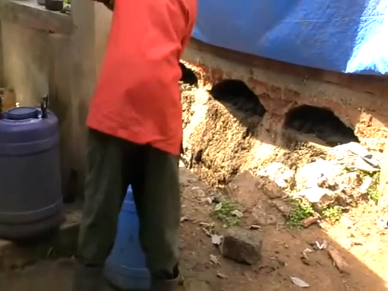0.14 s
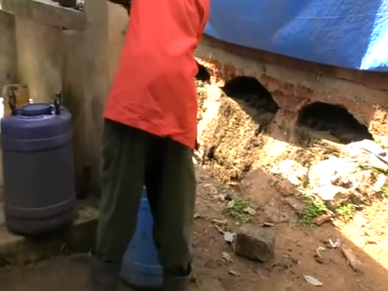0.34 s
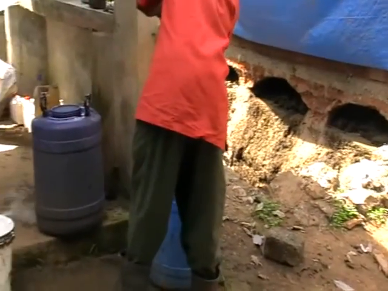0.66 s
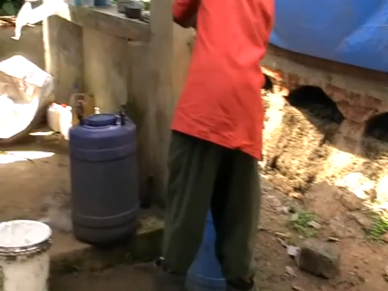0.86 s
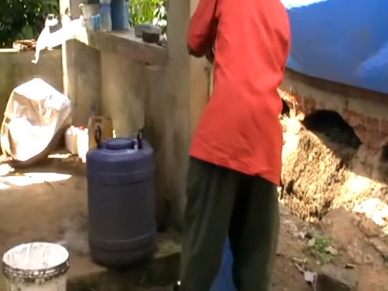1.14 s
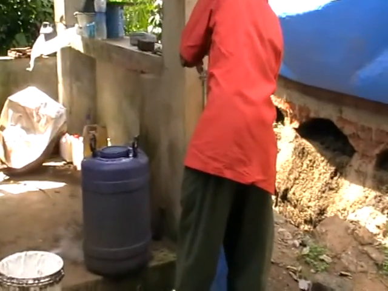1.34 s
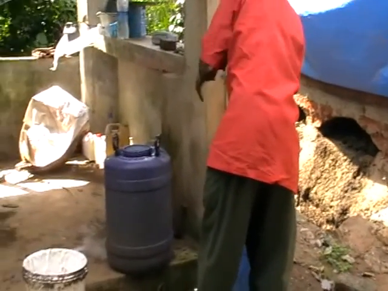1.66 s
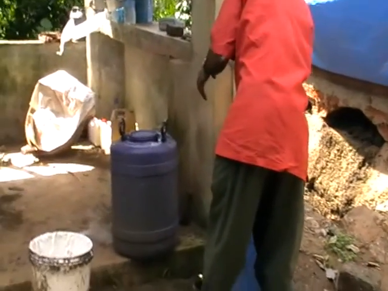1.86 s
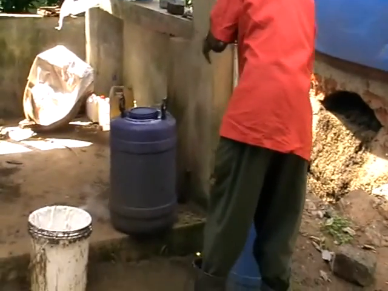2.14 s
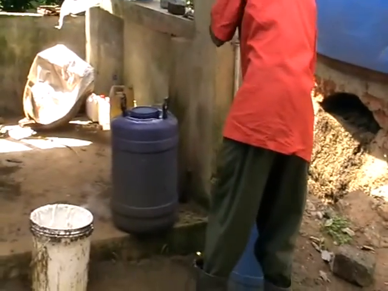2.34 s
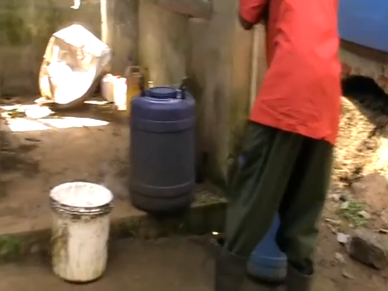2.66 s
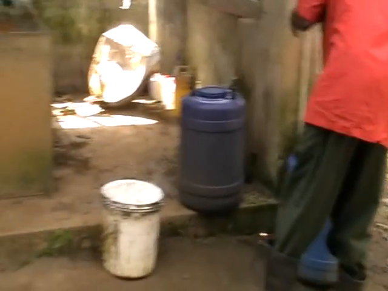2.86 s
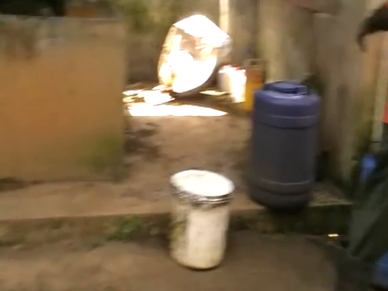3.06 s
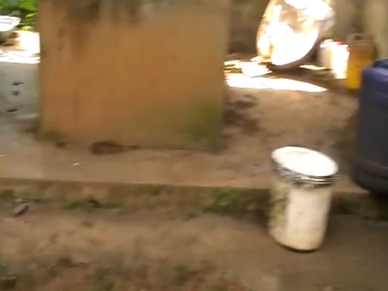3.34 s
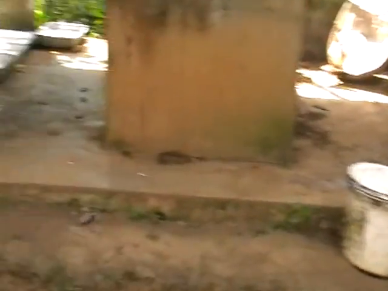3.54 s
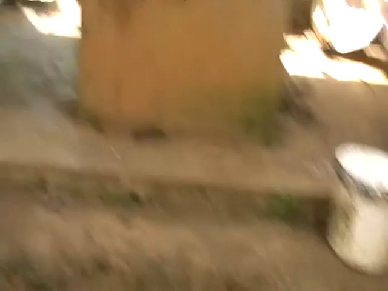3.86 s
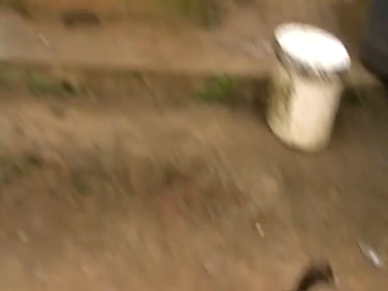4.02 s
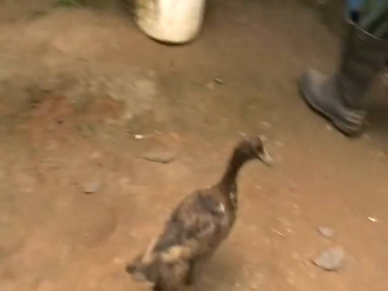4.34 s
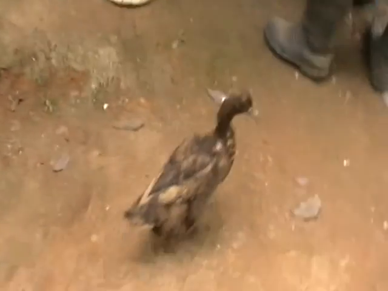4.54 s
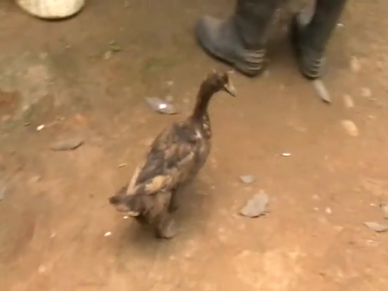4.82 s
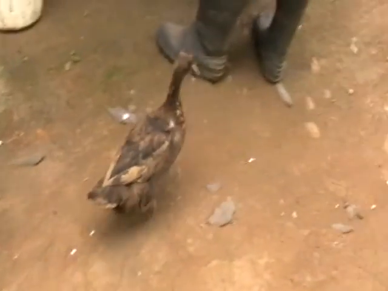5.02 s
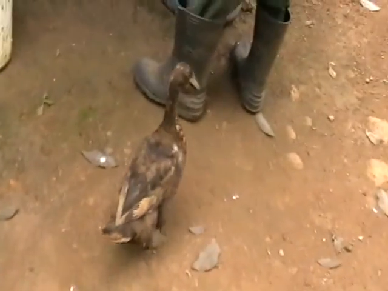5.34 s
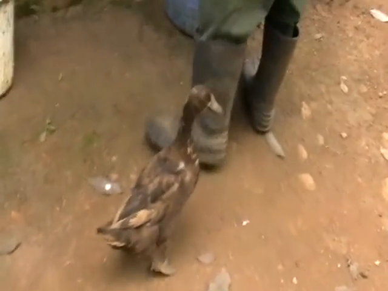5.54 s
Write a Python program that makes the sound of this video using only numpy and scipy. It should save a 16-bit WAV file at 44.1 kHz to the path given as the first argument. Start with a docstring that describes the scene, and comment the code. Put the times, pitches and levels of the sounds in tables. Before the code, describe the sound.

Outdoors, steady splashing water and buffeting wind noise surround a close duck's short nasal quacks, ending in fast dry clucks that grow loud.

```python
"""Water runs and splashes into a hollow container with a dull boom or two, and wind rumbles on a microphone's
two ports. Soft coos follow, then a duck in a walled yard: short quacks led in by coos, and at the end a
quickening run of clucks. Each quack or cluck is a handful of syrinx pulses ringing the throat; coos and booms
are gliding tones. Water is noise and droplets ringing the container, with single splats, plinks and ticks; now
and then a dull thud falls; wind is buffeted noise. A faint low drone lies beneath."""
import sys
import numpy as np
from scipy import signal
from scipy.fft import rfft, irfft
from scipy.io import wavfile
from scipy.ndimage import uniform_filter1d

SR = 44100
rng = np.random.default_rng(int(sys.argv[2]) if len(sys.argv) > 2 else 0)


def wrap_up_sound(samples):
    """Save the sound to the file named by the first command line argument, as 16-bit audio."""
    columns = np.atleast_2d(samples).T
    # keep every value between -1 and 1, then stretch to whole-number steps
    tamed = np.clip(columns, -1, 1)
    steps = np.round(tamed * 32767).astype(np.int16)
    wavfile.write(sys.argv[1], SR, steps)


N = 250929
T = np.arange(N) / SR  # seconds


def undb(db):
    """Decibels to gain."""
    return 10 ** (np.asarray(db) / 20)


def unit(x):
    """Scale to rms 1."""
    return x / np.sqrt(np.mean(x ** 2))


def curve(rows):
    """A (seconds, value) table as a line through time."""
    s, values = np.transpose(rows)
    return np.interp(T, s, values)


def add(out, x, s):
    """Mix x in from s seconds on."""
    i = max(int(s * SR), 0)
    out[..., i:i + x.shape[-1]] += x[..., :max(N - i, 0)]


def gains(points, size, ratio=1):
    """A (Hz, dB) outline on the bins of a transform; a larger body lowers it."""
    hz, db = np.transpose(points)
    bins_hz = np.arange(size // 2 + 1) * SR / size
    return undb(np.interp(np.log(bins_hz * ratio + 1), np.log(hz), db))


def colour(x, points):
    """Give a sound the outline of a spectrum."""
    return irfft(rfft(x) * gains(points, N), N)


def band(x, hz, width):
    """One resonance, gain 1 at its centre."""
    g = np.tan(np.pi * min(hz / SR, .45))
    k = width / hz
    return signal.lfilter([g * k, 0, -g * k], [1 + g * k + g * g, 2 * g * g - 2, 1 - g * k + g * g], x)


def walk(rate):
    """Smooth random wander with spread 1, taking rate steps per second."""
    k = max(int(SR / rate), 2)
    steps = np.repeat(rng.standard_normal(N // k + 1), k)
    return unit(uniform_filter1d(steps, k)[:N])


def spread(mid, side, side_db):
    """Left and right from a common and an opposed part."""
    return mid + undb(side_db) * np.array([side, -side])


def swell_gain(start, hold, db, rise, fall):
    """A gain that rises, holds and dies away."""
    before = np.maximum(start - T, 0)
    after = np.maximum(T - start - hold, 0)
    return undb(db) * np.exp(-before / rise - after / fall)


def tones(table, overtone_db, waver, rough, crest=0.56):
    """Short gliding, fluttering tones with a weak octave, loudest at the share crest of their length."""
    out = np.zeros(N)
    for s, length, hz, glide, db in table:
        n = int(length * SR)
        octaves = glide * (np.arange(n) / SR - length / 2)
        pitch = hz * 2 ** octaves * (1 + waver * walk(180)[:n])
        phase = 2 * np.pi * np.cumsum(pitch) / SR
        progress = np.interp(np.arange(n) / n, [0, crest, 1], [0, .5, 1])
        shape = np.sin(np.pi * progress) ** 2 * (1 + rough * walk(400)[:n])
        tone = np.sin(phase) + undb(overtone_db) * np.sin(2 * phase)
        add(out, undb(db) * shape * tone, s - length / 2)
    return out


# The drone's loudness. Each row: time in seconds, rms level in dB.
DRONE_LEVEL = [(0, -50), (1.1, -47.5), (2.4, -54.5), (3.2, -44.5), (5.69, -44)]
DRONE_HZ = 246.8


def drone():
    """A faint low sine that wavers in pitch."""
    phase = 2 * np.pi * np.cumsum(DRONE_HZ + 5 * walk(18)) / SR
    return undb(curve(DRONE_LEVEL)) * unit(np.sin(phase))


# Gusts on the ports. Each row: start in seconds, hold in seconds, level in dB before the port balance.
GUSTS = [(0.46, 0.44, -50), (0.855, 0.86, -40.5), (1.77, 0.073, -34.5), (2.016, 0.24, -40),
         (3.604, 0.36, -38.5), (4.123, 0.17, -31.5), (4.343, 0.22, -26.5), (4.615, 0.24, -32.5),
         (4.95, 0.15, -28.5), (5.168, 0.066, -30.5), (5.27, 0.39, -37.5)]
# Outline of the wind rumble. Each row: frequency in Hz, relative level in dB.
WIND_SPECTRUM = [(15, -55), (25, -44), (62, -3), (129, -0.5), (186, -4), (236, -8.5), (340, -15.5),
                 (528, -29), (659, -31.5), (1140, -40), (1500, -45), (1950, -65), (3300, -120)]
GUST_RISE_S, GUST_FALL_S = .02, .04
BREEZE_DB = -63.5  # light air between gusts, before the port balance
EDDY_DB, EDDIES_PER_S = 2, 22  # depth and rate of the buffeting


def eddies(force):
    """Low noise driven by the force of the wind and buffeted at random."""
    rumble = unit(colour(rng.standard_normal(N), WIND_SPECTRUM))
    return rumble * force * undb(EDDY_DB * walk(EDDIES_PER_S))


def wind():
    """Eddies buffet the two ports, more against each other than together, and the right a little harder."""
    gust_power = sum(swell_gain(*gust, GUST_RISE_S, GUST_FALL_S) ** 2 for gust in GUSTS)
    force = np.sqrt(undb(BREEZE_DB) ** 2 + gust_power)
    left, right = spread(eddies(force), eddies(force), side_db=3)
    return np.array([undb(-1.5) * left, undb(0.5) * right])


def droplets(rate, scatter_db):
    """Dense tiny impacts of very uneven size, rate per second."""
    sizes = undb(scatter_db * np.minimum(rng.exponential(size=N), 4))
    hits = rng.random(N) < rate / SR
    return unit(rng.choice([-1, 1], N) * sizes * hits)


def hollow(modes):
    """Air resonances kept ringing by the stream, rounded off by one broad resonance."""
    ringing = sum(undb(db) * band(rng.standard_normal(N), hz, width) for hz, width, db in modes)
    return unit(band(ringing, 210, 670))


# Strength of the stream. Each row: time in seconds, level of the fine spray in dB before its trim.
FLOW = [(0, -53), (0.75, -54), (1.35, -49), (1.9, -51), (2.45, -48.5), (3.2, -51.5), (3.95, -47),
        (4.55, -49.5), (4.85, -47), (5.25, -52.5), (5.69, -50.5)]
# Outline of the splashing. Each row: frequency in Hz, relative level in dB.
SPLASH_SPECTRUM = [(240, -6.5), (400, -5), (511, -10), (633, -2), (796, -4.5), (1150, -6.5), (1630, -7),
                   (1960, -6.5), (2120, -6.5), (3850, -10.5), (7210, -11.5), (11400, -17), (15500, -25.5)]
# Air in the container. Each row: frequency in Hz, width in Hz, relative drive in dB.
CONTAINER_AIR = [(113, 83, -1), (197.5, 49, -5.5), (260, 45, -10.5), (327, 83, -3.5), (628, 15, -5.5),
                 (1664, 62, -8), (2107, 24, -5)]
# What the square hit rings. Each row: frequency in Hz, width in Hz, relative drive in dB.
SQUARE_RING = [(195, 23, 1), (304, 35, 1), (623, 20, -2)]
# The stream hits the container squarely for a moment. One row: start in seconds, hold in seconds, level in dB.
SQUARE_HIT = (2.27, 0.7, -38.5)
SQUARE_EDGE_S = 0.05  # rise and fall
# The coarse splash follows the flow less than the spray does.
USUAL_FLOW_DB, SPLASH_DB, SPLASH_PER_DB = -50, -37, 0.47
SPRAY_TRIM_DB, DRUM_DB = -1, -43


def water():
    """A stream breaks into droplets; its spray comes and goes, and it drums on the air in the container."""
    mid, side = (colour(rng.standard_normal(N) + 0.6 * droplets(2500, 2.7), SPLASH_SPECTRUM) for _ in range(2))
    fine = signal.butter(2, 9000, "high", fs=SR, output="sos")  # splits spray from splash
    flow_db = curve(FLOW)

    splash = spread(mid, side - 0.7 * band(side, 530, 2200), side_db=-9) / np.std(mid)
    coarse = splash - signal.sosfiltfilt(fine, splash)
    splash_db = SPLASH_DB + SPLASH_PER_DB * (flow_db - USUAL_FLOW_DB) + .5 * walk(25.18)

    spray = unit(signal.sosfiltfilt(fine, spread(mid, side, side_db=-5.5)))
    spray_db = flow_db + SPRAY_TRIM_DB + 2 * walk(40)

    drumming = hollow(CONTAINER_AIR) * undb(DRUM_DB + walk(9.9))
    square = hollow(SQUARE_RING) * swell_gain(*SQUARE_HIT, SQUARE_EDGE_S, SQUARE_EDGE_S)
    return coarse * undb(splash_db) + spray * undb(spray_db) + drumming + square


# Dull booms. Each row: middle in seconds, length in seconds, pitch in Hz, glide in octaves per second, level in dB.
BOOMS = [(.152, .085, 202.3, -1.1, -27.5), (.215, 0.0483, 197, 1, -29.5), (3.48, .3, 133.2, 0.62, -41)]


def booms():
    """Low tones that swell, flutter and glide."""
    return tones(BOOMS, overtone_db=-18.0, waver=0.088, rough=0.34)


def spatters(table, width):
    """Noise bursts that each die away in one resonance, its width a share of its centre."""
    t = np.arange(SR // 4) / SR
    out = np.zeros((2, N))
    for s, db, hz, decay_s in table:
        noise = rng.standard_normal((2, len(t)))
        mid, side = unit(band(band(noise, hz, width * hz), hz, width * hz))
        add(out, undb(db) * np.exp(-t / decay_s) * spread(mid, side, side_db=-24), s)
    return out


# Single hits. Each row: start in seconds, level before the decay in dB, centre in Hz, decay in seconds.
SPLATS = [(.18, -39.5, 750, 0.063), (1.094, -34, 3700, 0.02), (1.383, -38.5, 8800, .035),
          (2.388, -36, 8140, 0.06), (2.435, -37, 2770, 0.029), (2.468, -32.5, 1800, 0.017),
          (2.636, -38.5, 10000, 0.017), (2.638, -36.5, 2000, 0.025), (2.771, -33, 6900, 0.033),
          (2.975, -38, 2400, 0.018), (4.506, -33, 2200, 0.031), (5.523, -35.5, 3770, .022)]  # water, broad and soft
PLINKS = [(1.383, -39, 2350, .026), (1.645, -38.5, 2740, 0.019), (1.897, -35.5, 490, 0.023),
          (1.899, -37, 643, 0.025), (2.02, -32, 1650, 0.0098), (2.15, -32, 623, 0.021),
          (2.21, -34, 714, 0.015)]  # drops
TICKS = [(2.5755, -23.5, 6500, 0.001), (3.9045, -19, 4150, 0.0017), (3.905, -21, 1100, 0.0032)]  # sharp
THUDS = [(.3, -37, 315, 0.012), (2.305, -36, 298, 0.02), (2.392, -30.5, 282, 0.033),
         (3.922, -32, 230, 0.011), (4.422, -22.5, 292, 0.024), (4.505, -25, 187, 0.037)]  # dull


def single_hits():
    """Broad splats, narrow plinks, sharp ticks and dull thuds, each a decaying burst."""
    water_hits = spatters(SPLATS, width=0.83) + spatters(PLINKS, width=0.15)
    return water_hits + spatters(TICKS, width=1.2) + spatters(THUDS, width=0.45)


# The upper resonance of the bill gives a call its edge: centre, and width in octaves.
EDGE_HZ, EDGE_OCTAVES = 2360, 0.11


def ring(points, ratio, sharpness, edge_db, size=1024):
    """Causal (minimum-phase) response of the throat and bill to one pulse, peak 1."""
    octaves = np.log2((np.arange(size // 2 + 1) * SR / size * ratio + 1) / EDGE_HZ)
    edge = undb(edge_db * np.exp(-(octaves / EDGE_OCTAVES) ** 2 / 2))
    cepstrum = irfft(sharpness * np.log(gains(points, size, ratio)) + np.log(edge))
    # folding the cepstrum forward leaves no ringing before the pulse
    cepstrum[1:size // 2] *= 2
    cepstrum[size // 2 + 1:] = 0
    h = irfft(np.exp(rfft(cepstrum)))
    return h / np.abs(h).max()


THROAT_WOBBLE = .025  # share of the throat size
BILL_HZ, BILL_WIDTH_HZ = 1700, 900


def calls(table, throat, jitter, slowing, breath_db, hiss_db, open_s, focus, scatter_db, count=12, size=8192):
    """Each call is a short train of syrinx pulses, slowing or quickening, that ring the throat."""
    out, t = np.zeros(N), np.arange(size) / SR
    k = np.arange(-count, count)  # pulse number; 0 is the first full one
    lead = size / SR / 2
    above_throat = signal.butter(8, 3300, "high", fs=SR, output="sos")
    for s, db, hz, swell, hold, fade, ratio, rasp_db, edge_db in table:
        timing, strength = rng.standard_normal((len(k), 2)).T
        at = (k + slowing * k ** 2 + jitter * timing * (k != 0)) / hz
        envelope = np.exp(-(np.minimum(at, 0) / swell) ** 2 / 2 - np.maximum(at - hold, 0) / fade)
        force = envelope * undb(scatter_db * strength)
        place = np.clip((lead + at) * SR, 0, size - 1).astype(int)
        pulses = np.bincount(place, force, size)

        # a puff of turbulence follows each pulse: faint in the body of the call, a rasp in its treble
        puffs = signal.fftconvolve(pulses, np.exp(-t / open_s))[:size] * rng.standard_normal(size)
        source = pulses + undb(breath_db) * puffs
        rasp = undb(rasp_db) * (.35 * pulses + undb(hiss_db) * puffs)
        source += signal.sosfiltfilt(above_throat, rasp - source)

        # in a gentle call, one with little rasp, the bill opens less: the throat rings longer and narrower
        sharpness = 1 + focus * max(-rasp_db, 0)
        # the throat quivers between a wider and a narrower shape from pulse to pulse
        wide = np.interp(t, lead + at, rng.random(len(k)))
        call = 0
        for share, way in ((wide, 1), (1 - wide, -1)):
            response = ring(throat, ratio * (1 + way * THROAT_WOBBLE), sharpness, edge_db)
            call = call + signal.fftconvolve(source * share, response)
        call -= 2 * band(call, BILL_HZ, BILL_WIDTH_HZ)  # all-pass: the bill takes a cycle to start ringing
        loudness = np.sqrt(np.sum(call ** 2) / (SR / 100))  # rms as if packed into 10 ms
        add(out, undb(db) * call / loudness, s - lead)
    return out


# A louder call takes longer to die away; fades are given for a call at CALL_DB.
CALL_DB, FADE_DOUBLES_DB = -20, 9


def voiced(rows, fade_s):
    """Give each call the fade that goes with its loudness."""
    return [(s, db, hz, swell, hold, fade_s * 2 ** ((db - CALL_DB) / FADE_DOUBLES_DB), ratio, rasp_db, edge_db)
            for s, db, swell, hold, ratio, rasp_db, edge_db, hz, *_ in rows]


# Open quacks. Each row: first full pulse in seconds, level in dB, swell in seconds, hold in seconds,
# throat size ratio, rasp in dB, edge in dB, pulse rate in Hz, then the coo that leads in:
# its length before the break in seconds, glide in octaves per second, level in dB.
QUACKS = [(0.8052, -22, 0.0041, 0.0045, 0.99, -11, -6, 231.3, 0.049, -7, -28.5),
          (0.9975, -21.5, 0.0033, 0.0035, 1.005, -11, -16, 231, 0.048, -3.5, -27),
          (3.5748, -22, 0.0034, 0.007, 1.02, -9, -4, 243, 0.043, 5, -28.5),
          (3.7265, -16, 0.0083, 0.0034, 1, -7, -6, 253.7, 0.04, -4.5, -29),
          (4.153, -12, 0.003, 0.017, 1.015, -10.5, 0, 262, 0.035, 5.5, -31.5),
          (4.35, -13.5, 0.0037, 0.013, 1.023, -8, 4, 264.6, 0.045, 0, -29)]
# A hoarse, throaty call. One row: first full pulse in seconds, level in dB, pulse rate in Hz, swell in seconds,
# hold in seconds, fade in seconds, throat size ratio, rasp in dB, edge in dB.
HOARSE_CALL = (2.112, -27, 216, .012, .016, .01, 1.27, -8, 2)
# Throat and bill, open. Each row: frequency in Hz at size ratio 1, response in dB before sharpening.
OPEN_THROAT = [(300, -32.5), (550, -16), (750, -12), (1000, -11), (1220, -15), (1400, -7), (1560, 0.5),
               (1860, -0.5), (2100, -10), (2500, -9.5), (2850, -20.5), (3350, -20), (4100, -29),
               (4800, -16), (5600, -23), (6150, -10.5), (6750, -20.5), (12000, -38)]
QUACK_FADE_S = 0.0068


def quacks():
    """Open-billed calls, their pulses nearly regular."""
    return calls(voiced(QUACKS, QUACK_FADE_S) + [HOARSE_CALL], OPEN_THROAT, jitter=.006, slowing=.012,
                 breath_db=-30, hiss_db=-11.0, open_s=.0014, focus=0.022, scatter_db=.8)


# Creaky clucks. Each row: first full pulse in seconds, level in dB, swell in seconds, hold in seconds,
# throat size ratio, rasp in dB, edge in dB, pulse rate in Hz.
CLUCKS = [(4.728, -33.5, 0.0088, 0.0028, 1.04, 3, 6, 149), (4.838, -36.5, 0.0071, .001, 1, -3, -5, 148),
          (4.955, -33, 0.0056, .001, 0.95, 0, 0, 150), (5.0672, -25.5, 0.0077, .001, 0.93, 1, 0, 134.6),
          (5.1742, -21, 0.0045, 0.0011, 0.96, -5, 6, 161.5),
          (5.2888, -22.5, 0.0095, .001, 1.02, -4, 1, 101.7),
          (5.3866, -19, 0.0088, 0.0015, 0.967, -7, 3, 164),
          (5.4918, -17, 0.011, 0.00092, 0.98, 2, 7, 161.6),
          (5.5887, -10.5, 0.006, 0.042, 1.006, 0.5, 2, 167.7),
          (5.6724, -13, 0.0037, 0.0058, 0.99, -3.5, -6, 192)]
# Throat with the bill nearly shut. Each row: frequency in Hz at size ratio 1, response in dB before sharpening.
SHUT_THROAT = [(300, -18), (600, -13.5), (930, -1), (1160, -14.5), (1400, 2.5), (1590, 10.5), (1920, -1.5),
               (2100, 3.5), (2400, -14), (2800, -21), (3500, -31), (4200, -25), (5900, -29), (7400, -40),
               (12000, -63)]
CLUCK_FADE_S = 0.0046


def clucks():
    """Slower, drier pulse trains that stop short, with the bill nearly shut."""
    return calls(voiced(CLUCKS, CLUCK_FADE_S), SHUT_THROAT, jitter=.018, slowing=-.008,
                 breath_db=-27, hiss_db=-8.0, open_s=.0018, focus=.005, scatter_db=1.0)


# Coos that break into no quack. Each row: middle in seconds, length in seconds, pitch in Hz,
# glide in octaves per second, level in dB.
LONE_COOS = [(.607, .065, 880, 1.5, -35.5), (.71, 0.031, 937, -6, -35)]
COO_HZ = 961  # pitch at the break into a quack
COO_OVERLAP_S = 0.019


def coos():
    """Soft tones; each lead-in glides to COO_HZ at the break and dies away under the first pulses."""
    lead_ins = []
    for s, *_, length, glide, db in QUACKS:
        offset = (COO_OVERLAP_S - length) / 2  # from the break to the middle of the coo
        lead_ins.append((s + offset, length + COO_OVERLAP_S, COO_HZ * 2 ** (glide * offset), glide, db))
    leads = tones(lead_ins, overtone_db=-13, waver=.02, rough=.2, crest=.58)
    return leads + tones(LONE_COOS, overtone_db=-13, waver=.06, rough=.65)


def duck():
    """Coos that swell and break into quacks, and the clucks."""
    return quacks() + clucks() + coos()


ECHO_BUILD_S = 0.0084  # the echoes thicken as the walls answer


def yard(x, t60, wet_db, side_db, size=16384):
    """Scattered echoes from the ground and the walls, as noise falling 60 dB in t60 seconds."""
    t = np.arange(size) / SR
    decay = np.exp(-np.log(1000) * t / t60)
    echoes = rng.standard_normal((2, size)) * decay * np.minimum(t / ECHO_BUILD_S, 1) ** 2
    echoes /= np.sqrt(np.sum(echoes ** 2, axis=1, keepdims=True))
    wet = signal.fftconvolve(x[None], spread(*echoes, side_db), axes=1)[:, :N]
    return x + undb(wet_db) * wet


def scene():
    """The duck close by, over water and wind."""
    background = drone() + wind() + water() + booms() + single_hits()
    return background + yard(duck(), t60=.18, wet_db=-12, side_db=-7)


TOP_HZ = 15800


def record(dry):
    """The recorder thins the deepest bass and cuts the top."""
    thinned = signal.sosfilt(signal.butter(2, 30, "high", fs=SR, output="sos"), dry)
    return signal.sosfilt(signal.ellip(10, .2, 80, TOP_HZ, fs=SR, output="sos"), thinned)


dry = scene()
out = record(dry)
wrap_up_sound(out)
```